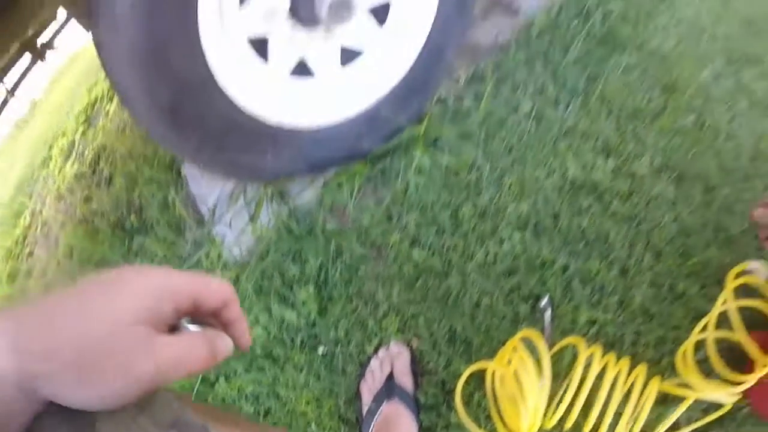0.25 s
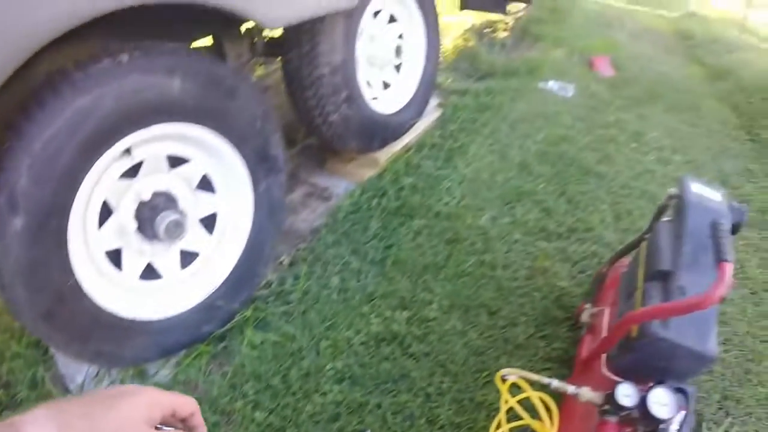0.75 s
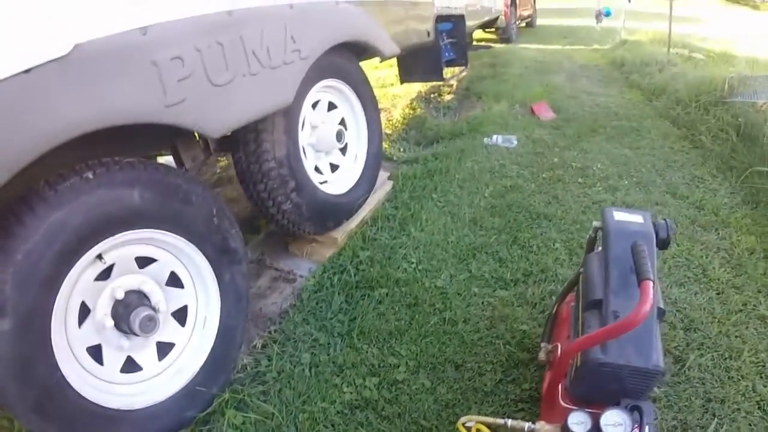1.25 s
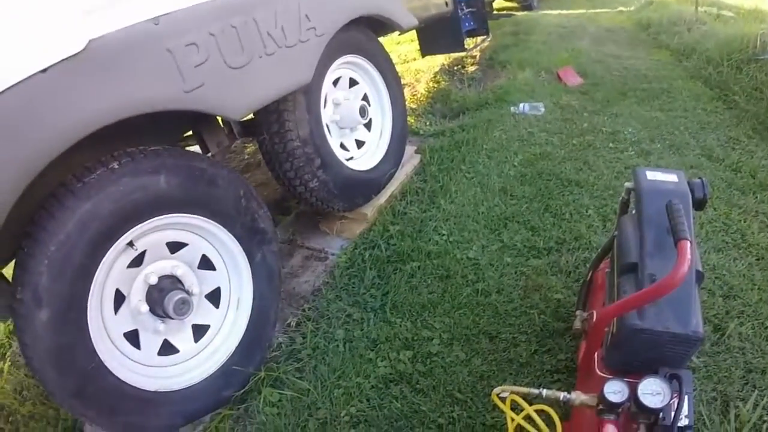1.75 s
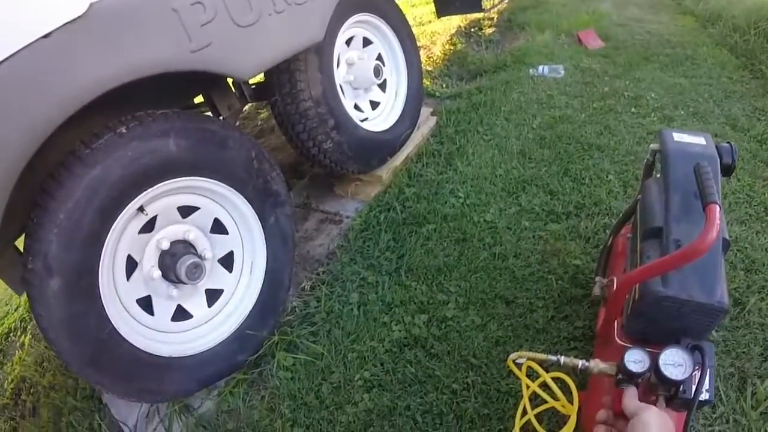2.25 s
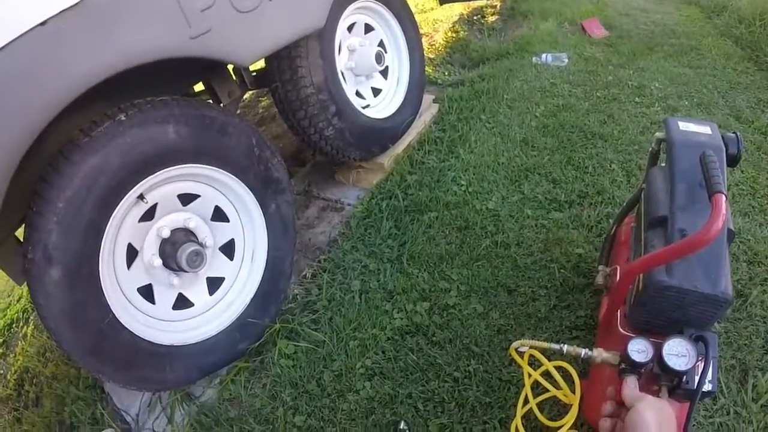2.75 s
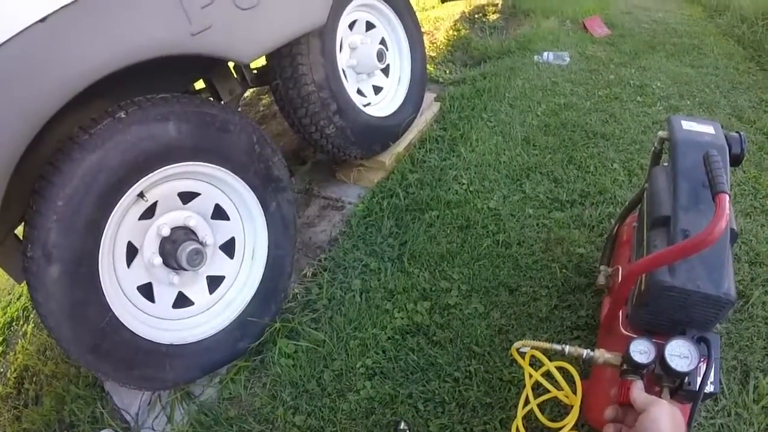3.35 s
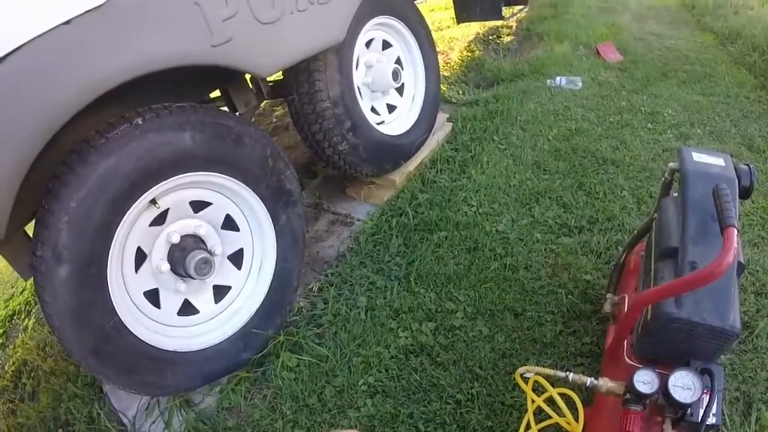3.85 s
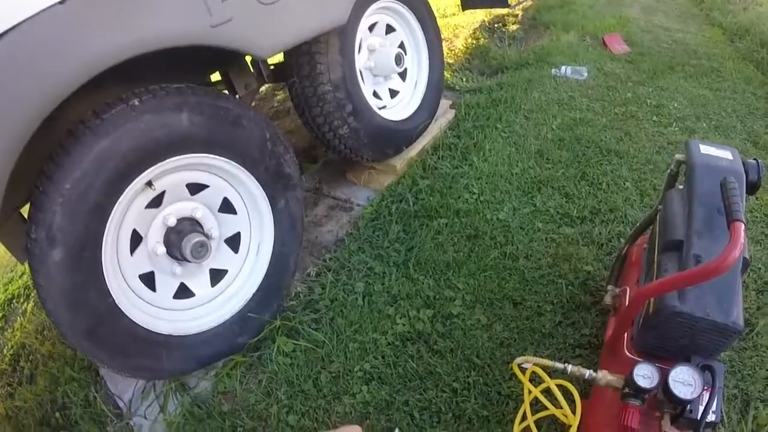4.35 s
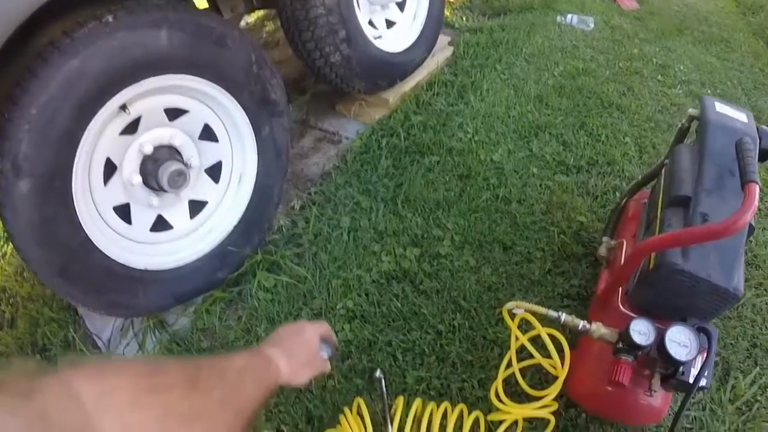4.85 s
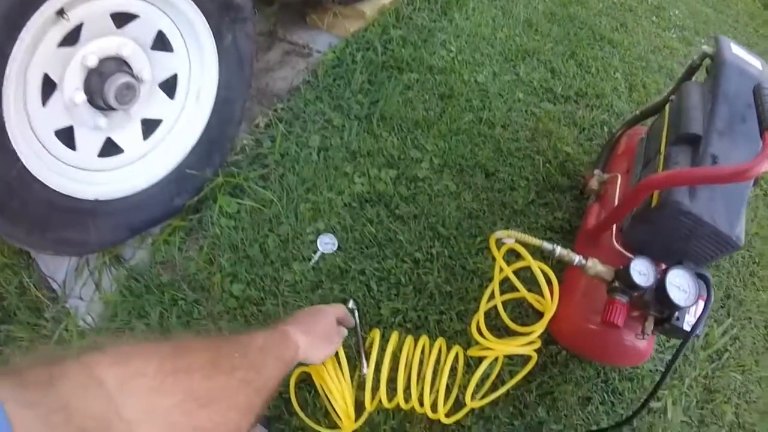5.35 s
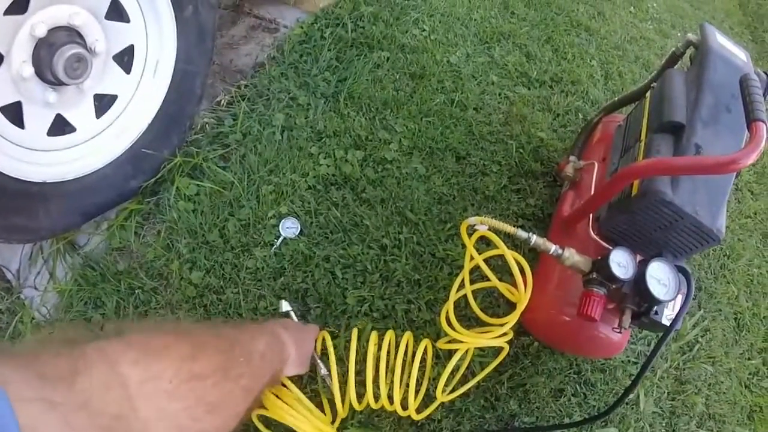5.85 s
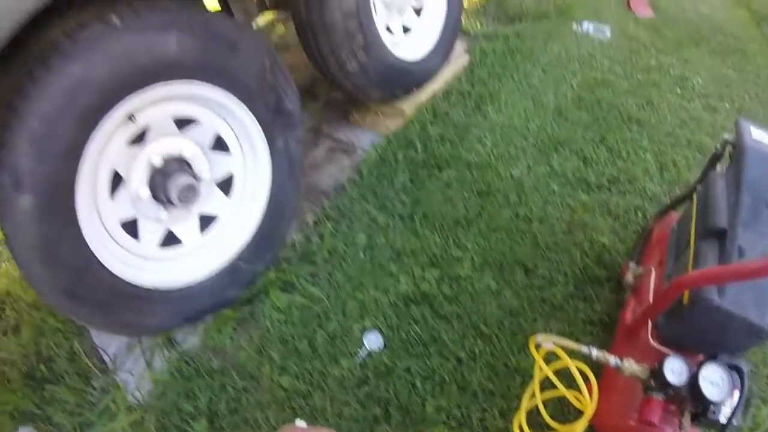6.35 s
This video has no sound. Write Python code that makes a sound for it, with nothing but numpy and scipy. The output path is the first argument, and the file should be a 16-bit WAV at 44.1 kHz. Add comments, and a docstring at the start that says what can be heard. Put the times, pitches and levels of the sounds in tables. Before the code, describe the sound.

Loud, unbroken machine noise outdoors: a piston air compressor chattering at close range, with a hard low throb, rough midrange knocking and only a thin layer of metallic clatter and hiss. Pitch stays practically level, sagging imperceptibly. The enclosed microphone on the operator's head dulls the treble; tone and level drift as he straightens, then stoops again near the end. The motor never starts or stops, and nothing else is heard.

```python
"""Piston compressor on a lawn

A small piston air compressor runs a step from a microphone in a head-worn camera; the wearer bends and straightens.
Each turn of the crank gives a sharp intake pop, summed from crank overtones, and an uneven second knock of
filtered impulses. Coloured noise, swelling with the stroke, makes valve rattle, clatter, hiss and intake flow;
sine tones make the induction motor's hum and a faint drone. A muffling camera case leaves little above 1 kHz."""
import sys
import numpy as np
from scipy import signal
from scipy.fft import rfft, irfft, next_fast_len
from scipy.io import wavfile
from scipy.ndimage import uniform_filter1d

SR = 44100
rng = np.random.default_rng(int(sys.argv[2]) if len(sys.argv) > 2 else 0)


def master(y):
    """Save y as 16-bit WAV."""
    cut = np.clip(np.atleast_2d(y).T, -1, 1)
    pcm = np.round(cut * 32767)  # scale
    wavfile.write(sys.argv[1], SR, pcm.astype(np.int16))


N = 291059
TURN = 2048  # points in one turn of the crank
# Triples of settings below are for the microphone close, upright and stooped.


def undb(db):
    """Amplitude ratio of a level in dB."""
    return 10 ** (np.asarray(db) / 20)


def unit(x):
    """Scale x to an RMS of 1."""
    return x / np.sqrt(np.mean(x ** 2))


def colour(x, table):
    """Shape x by a (Hz, dB) spectrum that falls away steeply outside the table; RMS 1."""
    n = next_fast_len(len(x))
    hz, db = np.transpose(table)
    log_hz = np.log(np.arange(n // 2 + 1) * SR / n + 1)
    gain = undb(np.interp(log_hz, np.log(hz), db, -99, -99))
    return unit(irfft(rfft(x, n) * gain, n)[:len(x)])


def ring(x, modes):
    """Sum of (Hz, width Hz, dB) resonances excited by x."""
    return sum(undb(db) * signal.lfilter(*signal.iirpeak(hz, hz / width, SR), x) for hz, width, db in modes)


def walk(rate):
    """Random levels held 1 / rate s and slewed; RMS 1."""
    hold = int(SR / rate)
    steps = np.repeat(rng.standard_normal(N // hold + 1), hold)
    return unit(uniform_filter1d(steps, hold)[:N])


def linger(x, keep):
    """Rows that keep a share of the row before; spread unchanged."""
    return signal.lfilter([np.sqrt(1 - keep ** 2)], [1, -keep], x, axis=0, zi=keep * x[-1:])[0]


def bursts(turns, rows):
    """Loudness over one turn: steady 1 plus decaying (start turn, decay turns, size) bursts."""
    return 1 + sum(size * np.exp(-((turns - at) % 1) / fall) for at, fall, size in rows)


def rattle(turns, keep, fresh_db, rows):
    """Noise that nearly repeats every turn, plus fresh noise, both swelling with the stroke."""
    rough = linger(rng.standard_normal((int(turns[-1]) + 3, TURN // 2)), keep).ravel()
    again = unit(np.interp((turns + 1) * TURN / 2, np.arange(len(rough)), rough))
    return (again + undb(fresh_db) * rng.standard_normal(N)) * bursts(turns, rows)


def crank(t):
    """Turns of the crank since the first pop; its speed sags as tank pressure builds."""
    start_hz, sag_hz_per_s, sag_ends_s = 57.888, .024, 4.95
    first_pop_s = .00045
    speed_hz = start_hz - sag_hz_per_s * np.minimum(t, sag_ends_s)
    return np.cumsum(speed_hz) / SR - first_pop_s * start_hz


# where the microphone is: t/s, posture (0 close, 1 upright, 2 stooped), treble lift level/dB
HEAD_PATH = [(0, 0.39, 3.5), (.11, 0.11, 2), (.25, .01, -1.5), (.42, 0.18, -1), (.55, 0.3, -4),
             (.73, 0.66, -3), (1.19, 0.86, -1.5), (2.72, 0.85, -2), (3.5, 0.94, -0.5), (4.13, 1.22, -0.5),
             (4.85, 1.54, 2), (5.55, 1.88, -0.5), (5.9, 2.6, 0), (6.2, 1.95, -0.5), (6.6, 1.37, 0.5)]


def head(t):
    """The wearer's posture, the lift of the treble in dB, and the share of each posture."""
    s, *columns = np.transpose(HEAD_PATH)
    posture, lift_db = (np.interp(t, s, column) for column in columns)
    shares = [np.clip(1 - abs(np.clip(posture, 0, 2) - k), 0, 1) for k in range(3)]
    return posture, lift_db, shares


def at_posture(posture, values):
    """Slide a setting between its close, upright and stooped values."""
    return np.interp(posture, range(3), values)


# narrow bands that swell and fade as the head turns: t/s, lasting/s, f/Hz, level/dB re their layer
HEAD_TURN_BANDS = [(.15, .13, 5340, -9), (.3, 0.31, 2160, -5), (.35, 0.19, 2894, -5),
                   (.6, 0.24, 4000, -6.5), (.7, .35, 13900, -13), (.85, 0.19, 2300, -11),
                   (.9, 0.14, 2900, -12), (.95, .11, 4530, -5), (1.3, 0.44, 4240, -8.5),
                   (1.7, 0.08, 2490, -13), (4.0, .4, 13000, -12), (4.1, 0.18, 2580, -16),
                   (4.25, 0.14, 4870, -9), (4.7, 0.55, 2890, -7.5), (5.0, .45, 4550, -12),
                   (6.45, .22, 2540, -10.5)]
LAYER_EDGES_HZ = (3500, 8000)  # valves below (layer 0), clatter between (1), hiss above (2)
BAND_WIDTH_HZ = (105, 63, 380)  # among valves, clatter and hiss


def heard(raw, colours, shares, t, layer):
    """A layer in the colour of each posture, with the narrow bands that swell inside it."""
    out = sum(share * colour(raw, table) for share, table in zip(shares, colours))
    reach = 2 * BAND_WIDTH_HZ[layer]
    for at, lasting, hz, db in HEAD_TURN_BANDS:
        if np.searchsorted(LAYER_EDGES_HZ, hz) == layer:
            band = colour(raw, [(hz - reach, -30), (hz, 0), (hz + reach, -30)])
            out = out + undb(db) * np.exp(-((t - at) / lasting) ** 2) * band
    return out


def drone(t):
    """A faint steady sine far below the pops in level."""
    hz, rms_db = 35.7, -66
    return np.sqrt(2) * undb(rms_db) * np.sin(2 * np.pi * hz * t)


# magnetic tones: multiple of crank speed, multiple of twice the mains, level/dB re pop
MAGNETIC_TONES = [(0, 2, -34), (12, 1, -51), (16, 1, -38), (17, 1, -40), (18, 1, -37), (18, 2, -48)]
MAINS_HZ = 60


def motor(t, turns):
    """Rotor slots and mains field beat slowly against the crank overtones."""
    hum = 0
    for order, field, db in MAGNETIC_TONES:
        cycles = order * turns + 2 * field * MAINS_HZ * t + rng.random()
        hum = hum + np.sqrt(2) * undb(db) * np.sin(2 * np.pi * cycles)
    return hum


# a ticking reed valve's resonances: f/Hz, width/Hz, level/dB
REED_MODES = [(9770, 440, 3), (10400, 400, -6)]


def reed(turns):
    """A reed valve ticks twice a turn: noise bursts through its resonances, applied twice over."""
    ticks = rattle(turns, 0.8, 3, [(0.01, 0.19, 12), (.68, 0.041, 1.7)])
    return unit(ring(ring(ticks, REED_MODES), REED_MODES))


# colour of the escaping air: f/Hz, level/dB per Hz
HISS_COLOUR = [(8000, -1), (8400, -3), (9000, -3.5), (10400, -5), (11400, -7.5), (12400, -6), (12800, -2),
               (13200, -10), (13800, -3.5), (14400, -3.5), (15250, -10)]


def hiss(t, turns):
    """Air hisses in step with the crank as bursts of noise, the reed's ticks varying in level within it."""
    raw = rattle(turns, 0.99, 9.6, [(0.01, 0.26, 1.06), (.68, 0.037, 0.59)])
    air = heard(raw, [HISS_COLOUR], [1], t, layer=2)
    return air + undb(-6 + 2.0 * walk(2.12)) * reed(turns)


# colours of the clatter close, upright and stooped, one list each: f/Hz, level/dB per Hz
CLATTER_COLOURS = [
    [(2000, -25), (3400, -5.5), (3710, -15), (3980, -11), (4020, -6), (4130, 1), (4360, -1.5), (5410, 0),
     (5880, -4), (6550, -4.5), (6910, -6), (7810, -5.5), (8500, -20), (11000, -33), (18700, -120)],
    [(2000, -40), (3400, 2.5), (3700, -2), (4360, 0), (4530, -0.5), (4620, 0), (5140, -4), (5600, -1.5),
     (5680, 0), (6070, -3), (6250, -7), (6730, -5), (7180, -6.5), (7690, -2), (8500, -21.5), (11000, -46),
     (18700, -120)],
    [(2000, -30), (3400, -21), (3710, -5), (3760, -23), (4070, 4.5), (4620, 0), (4930, -3), (5350, 0.5),
     (5770, -5.5), (6110, -3), (6380, -9.5), (6860, -7), (7180, -12), (7840, -9), (8500, -27), (11000, -51),
     (18700, -120)],
]


def clatter(t, turns, shares):
    """Upper valve clatter: nearly repeating noise that swells each turn and dips as the swell starts."""
    raw = rattle(turns, 0.944, 1.7, [(-.05, 0.59, 2.5), (-.05, .07, -.9)])
    return heard(raw, CLATTER_COLOURS, shares, t, layer=1)


def slap(turns, at, spread_db):
    """A valve plate slaps its seat once a turn: a brief pulse of uneven size."""
    size = undb(spread_db * rng.standard_normal(int(turns[-1]) + 3))
    off_turns = (turns - at + .5) % 1 - .5
    return unit(size[(turns - at + 1.5).astype(int)] * np.exp(-(off_turns / .0015) ** 2))


def whine(turns):
    """A tone at 44 times crank speed, wandering in level."""
    return undb(-10.5 + 2 * walk(3.8)) * np.sin(2 * np.pi * 44 * turns)


# colours of the valves close, upright and stooped, one list each: f/Hz, level/dB per Hz
VALVE_COLOURS = [
    [(760, -46), (1300, -10), (1390, -10), (1620, -6), (1900, -3.5), (1990, -9), (2180, -2), (2370, -12),
     (2450, -2), (2810, 0.5), (2930, -13), (3090, -13), (3600, -7), (4680, -49), (7920, -120)],
    [(760, -44), (1300, -14), (1380, -8), (1620, -5), (1760, -7), (1790, -14.5), (1940, -24.5),
     (2090, -3.5), (2380, 0), (2450, -1), (2630, 2), (2910, -6.5), (3180, -1.5), (3380, -15.5), (3600, -21),
     (4680, -47), (7920, -120)],
    [(760, -39), (1300, -17), (1470, -12), (1620, -5.5), (1810, -6), (1840, -9.5), (1960, -3.5),
     (2120, -8.5), (2220, -1), (2390, -1.5), (2750, 1), (3090, -6.5), (3600, -8.5), (4680, -33),
     (7920, -120)],
]
SLAP_DB = (-17.5, -4, -9)  # slap beside the raw rattle, before colouring


def valves(t, turns, posture, shares):
    """Lower valve rattle with two plate slaps a turn, and a whine heard when upright."""
    noise = rattle(turns, 0.98, -3, [(-.13, 0.23, 1.9), (.15, 0.11, 0.66)])
    slaps = slap(turns, -0.0639, 1.8) + undb(-5.5) * slap(turns, 0.028, 2.4)
    raw = noise + undb(at_posture(posture, SLAP_DB)) * slaps
    return heard(raw, VALVE_COLOURS, shares, t, layer=0) + shares[1] * whine(turns)


# intake turbulence: f/Hz, level/dB per Hz
FLOW_COLOUR = [(15, -21), (40, -24), (100, -22), (200, -22.5), (300, -13.5), (450, -7.5), (600, 0.5),
               (680, -5), (800, -6.5), (1000, -12), (1200, -28.5), (1400, -42), (2000, -27.5)]


def flow(turns):
    """Air drawn through the intake is turbulent: noise with two swells a turn."""
    swells = bursts(turns, [(.33, 0.23, 3.6), (-.05, 0.13, 1.8)])
    return colour(rng.standard_normal(N) * swells, FLOW_COLOUR)


# resonances of the second knock: f/Hz, width/Hz, level/dB
KNOCK_MODES = [(470, 55, 12), (534, 22, 17), (800, 180, -35)]
KNOCK_TURN = 0.4258  # share of a turn after the pop


def knock(turns):
    """A second knock each turn: ringing blows of uneven size and sign."""
    at = np.flatnonzero(np.diff(np.floor(turns - KNOCK_TURN)))
    chance = rng.standard_normal((len(at), 2))
    blows = np.zeros(N)
    blows[at] = chance[:, 0] + 1.56 * linger(chance[:, 1], 0.957)  # fresh plus slowly drifting size
    soft = signal.sosfilt(signal.butter(6, 950, fs=SR, output="sos"), blows)
    return unit(ring(ring(soft, KNOCK_MODES), [(592, 570, 0)]))


# the pop's overtones in each posture: multiple of crank speed, level/dB
POP_CLOSE = [(1, -9.5), (2, -5.5), (3, -15.5), (4, -16.5), (5, -19), (6, -30), (7, -1), (8, -7.5), (9, 3),
             (10, -22), (11, 1.5), (12, -12.5), (13, 6), (14, -2), (15, -23), (16, -21), (17, -5.5),
             (18, -21), (19, -45), (20, -23), (21, -24), (22, -47), (23, -58), (24, -60)]
POP_UPRIGHT = [(1, -13), (2, -10), (3, -21.5), (4, -16), (5, -8.5), (6, -12), (7, 2.5), (8, 0.5), (9, -9),
               (10, -8.5), (11, 1), (12, 0.5), (13, 3.5), (14, 3.5), (15, -10.5), (16, -10), (17, -15),
               (18, -19), (19, -31.5), (20, -20.5), (21, -30), (22, -29), (23, -53), (24, -40.5)]
POP_STOOPED = [(1, -12.5), (2, -8.5), (3, -17.5), (4, -20), (5, -13.5), (6, -8), (7, 3.5), (8, 0), (9, 0),
               (10, -18.5), (11, 0), (12, -17), (13, -3.5), (14, -2), (15, -10.5), (16, -33), (17, -16.5),
               (18, -71), (19, -50), (20, -35), (21, -28), (22, -33), (23, -45), (24, -36.5)]
SMEAR = (0.0058, 0.0041, 0.0034)  # lateness of higher overtones (turns per order)
LATE_TURNS = (0.041, .22, 0)  # further lateness of the overtones above the 15th


def pop(orders, smear, late, turns):
    """One turn of the intake pop: phases follow partly from the levels, and higher overtones arrive later."""
    k, db = np.transpose(orders)
    n = np.arange(TURN // 2 + 1)
    log_gain = np.interp(n, k, db) * np.log(10) / 20
    # fold the cepstrum to get the minimum phase of these levels
    cepstrum = irfft(log_gain)
    cepstrum[1:TURN // 2] *= 2
    cepstrum[TURN // 2 + 1:] = 0
    phase = 0.21 * rfft(cepstrum).imag + 2 * np.pi * (0.00052 * n - smear * (n - 8) ** 2) + 2.04
    phase[15:] -= 2 * np.pi * late * (n[15:] - 15)
    phase[1:4] = 2 * np.pi * (.46 - .13 * n[1:4])  # the tank rocks on the lowest three, later in the turn
    phase[18:] += np.pi  # above the camera case's resonance the sign flips
    sounding = (n >= 1) * (n <= len(k))
    wave = unit(irfft(np.exp(log_gain + 1j * phase) * sounding))
    return np.interp(turns % 1 * TURN, np.arange(TURN), wave, period=TURN)


def pops(turns, shares):
    """The intake pop of every turn, blended between the three postures."""
    settings = zip(shares, (POP_CLOSE, POP_UPRIGHT, POP_STOOPED), SMEAR, LATE_TURNS)
    return sum(share * pop(orders, smear, late, turns) for share, orders, smear, late in settings)


POP_DB, KNOCK_DB, FLOW_DB = (-13, -15, -15), (-12.5, -16, -13), (1, 0.5, 0)  # knock re pop, flow re knock
VALVE_DB, CLATTER_DB, HISS_DB = (-37, -41.5, -39.5), (-39.5, -48, -41.5), (-50, -56, -55)
VALVE_LIFT, HISS_LIFT = 0.84, .4  # shares of the treble lift; the clatter takes all of it


def scene():
    """The compressor's layers follow one crank, at the level of the wearer's posture, over a steady drone."""
    t = np.arange(N) / SR
    turns = crank(t)
    posture, lift_db, shares = head(t)
    valve_db = at_posture(posture, VALVE_DB) + VALVE_LIFT * lift_db
    clatter_db = at_posture(posture, CLATTER_DB) + lift_db
    hiss_db = at_posture(posture, HISS_DB) + HISS_LIFT * lift_db
    knock_and_flow = knock(turns) + undb(at_posture(posture, FLOW_DB)) * flow(turns)
    body = pops(turns, shares) + motor(t, turns) + undb(at_posture(posture, KNOCK_DB)) * knock_and_flow
    mix = drone(t) + undb(hiss_db) * hiss(t, turns)
    mix = mix + undb(clatter_db) * clatter(t, turns, shares)
    mix = mix + undb(valve_db) * valves(t, turns, posture, shares)
    mix = mix + undb(at_posture(posture, POP_DB)) * body
    return mix[None]


def record(dry):
    """The camera cuts the top steeply above 15.2 kHz."""
    return signal.sosfilt(signal.ellip(10, .2, 80, 15200, fs=SR, output="sos"), dry)


dry = scene()
out = record(dry)
master(out)
```